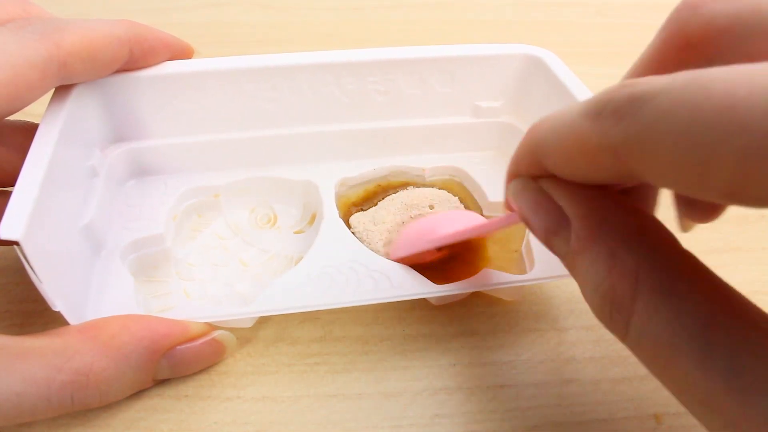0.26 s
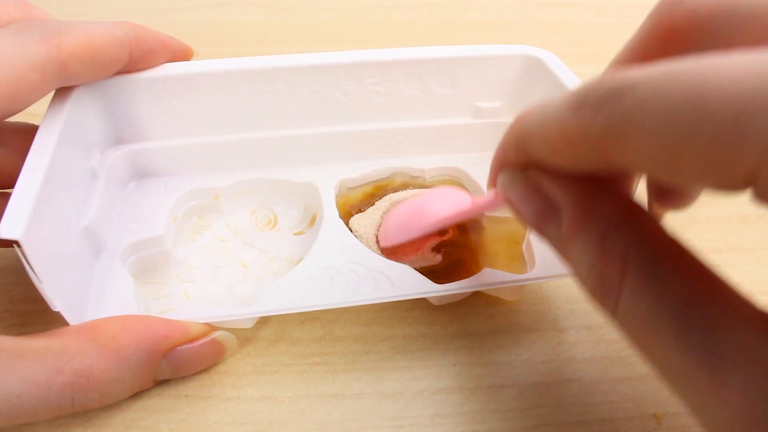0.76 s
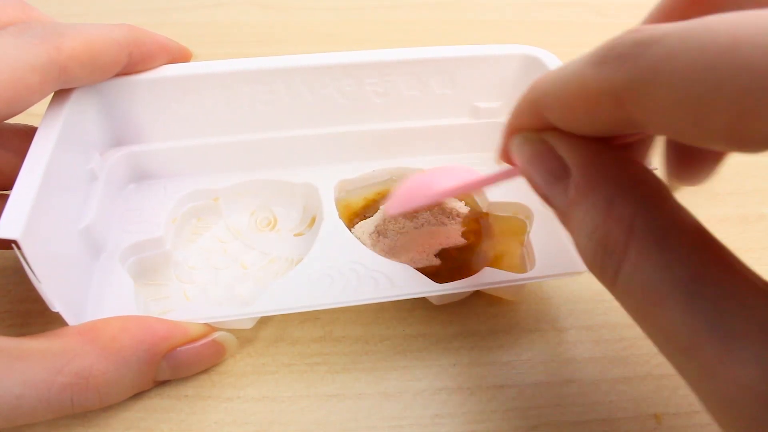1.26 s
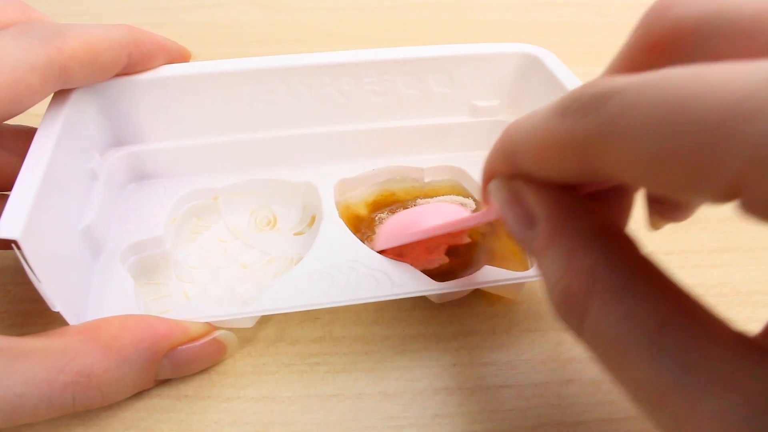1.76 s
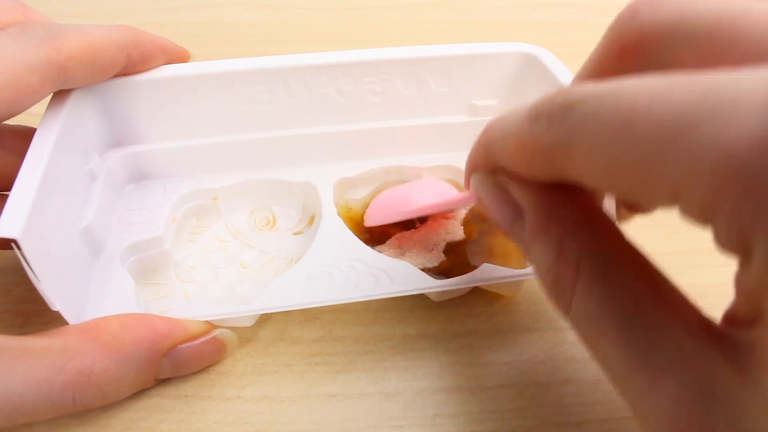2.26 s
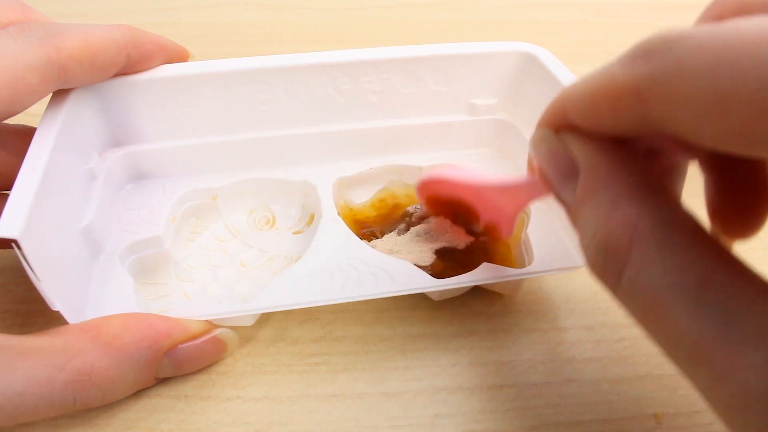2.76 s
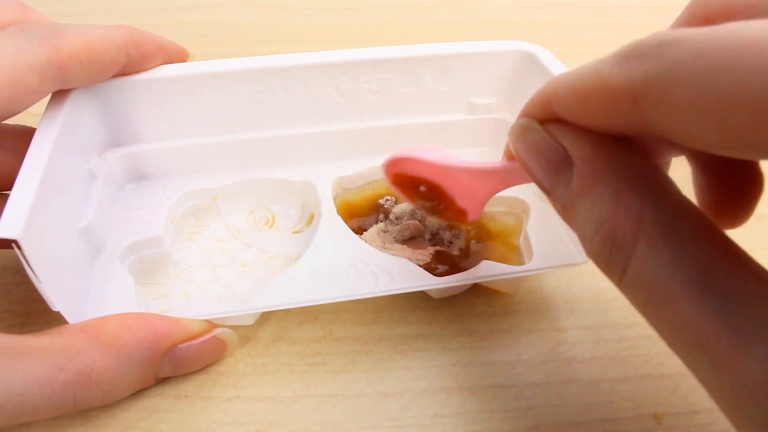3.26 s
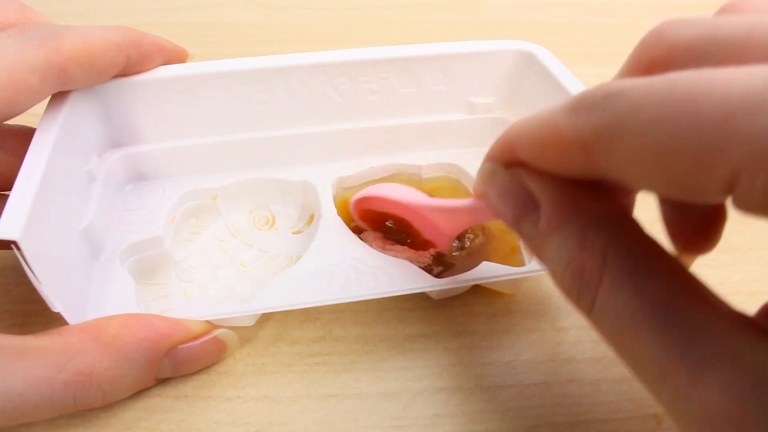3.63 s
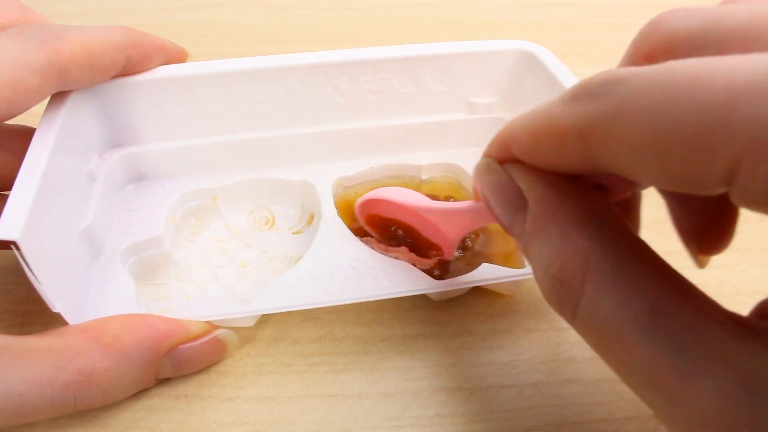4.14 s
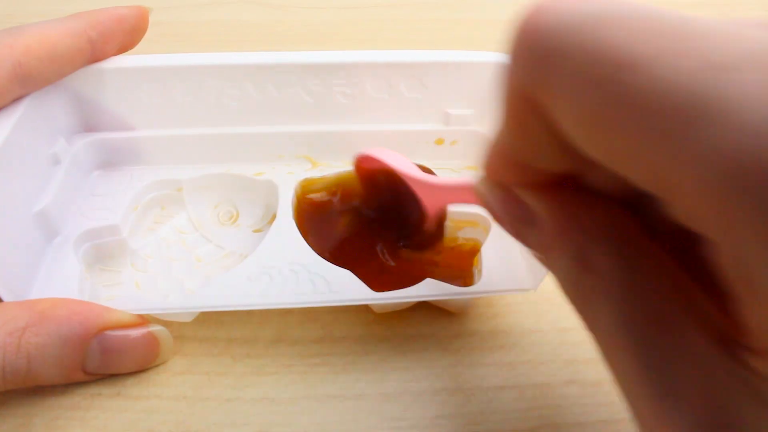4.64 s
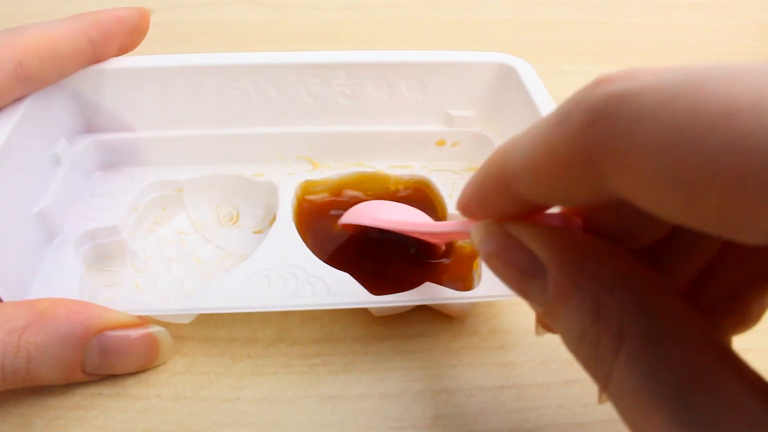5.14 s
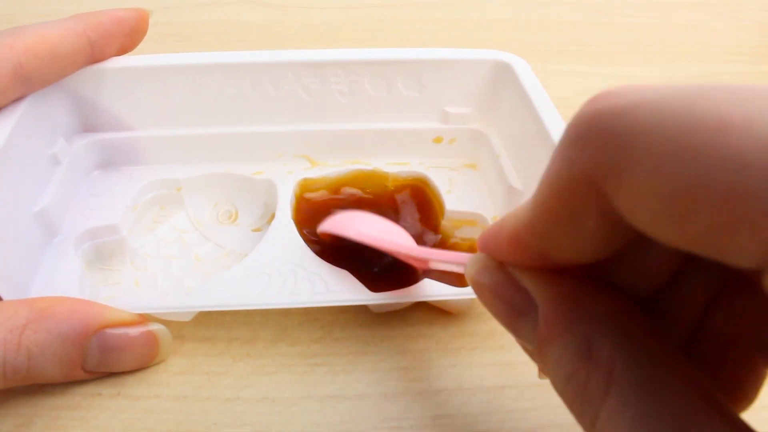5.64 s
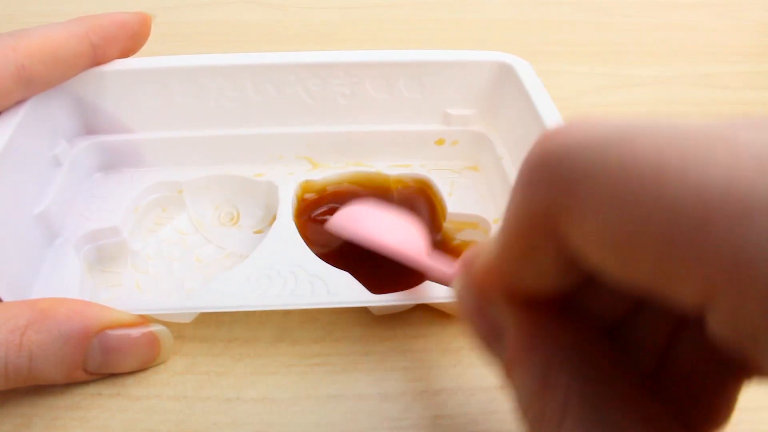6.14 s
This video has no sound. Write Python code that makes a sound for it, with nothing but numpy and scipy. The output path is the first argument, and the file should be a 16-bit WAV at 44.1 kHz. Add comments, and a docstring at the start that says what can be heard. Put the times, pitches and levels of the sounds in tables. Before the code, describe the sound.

Close, gritty spoon strokes with sharp plastic ticks work powder, then give way to wet squelching stirs, tiny squeaks and a final hard tap.

```python
"""A small plastic spoon clicks on a thin plastic tray, close to the microphone: noisy slips ring the tray's modes.
It works powder into sauce: gritty strokes of random grains swell and ease, most of them catching on the wall.
Later it stirs wet sauce: patchy crackles and tiny bubbles, two stick-slip squeaks, four rising plops,
and two knocks that ring the whole tray. A short room tail, a low hum and shaped air noise lie underneath."""
import sys
import numpy as np
from scipy import signal
from scipy.fft import rfft, irfft, next_fast_len
from scipy.io import wavfile
from scipy.ndimage import uniform_filter1d, map_coordinates

SR = 44100
rng = np.random.default_rng(int(sys.argv[2]) if len(sys.argv) > 2 else 0)


def wav_out(sig):
    """Save sig, one row per channel (or a flat mono array), as 16-bit PCM at SR to the path in sys.argv[1]."""
    wavfile.write(sys.argv[1], SR, np.round(np.clip(np.atleast_2d(sig).T, -1, 1) * 32767).astype(np.int16))


N = 282240

# Spoon catches on the tray. Each row: time in seconds, mid-band level in dB,
# treble against the mid band in dB, skid time in seconds (at least 0.002 is used).
SPOON_CONTACTS = [(0.044, -43, -5, 0.0061), (0.07, -48, 1, 0.0068), (0.313, -41.5, -7, 0.011),
                  (0.35, -42.5, -4.5, 0.0082), (0.616, -37, -15, 0.0019), (0.623, -38, -3, 0.015),
                  (0.8758, -30, -1.5, .005), (0.911, -37, -0.5, 0.006), (1.187, -46.5, -7, 0.017),
                  (1.216, -38, -4.5, 0.0042), (1.232, -45, -2.5, 0.0033), (1.457, -43, -3.5, 0.0042),
                  (1.4826, -30, -6, 0.0028), (1.489, -30, -1.5, 0.0021), (1.757, -49.5, 1, 0.024),
                  (1.7953, -27.5, .5, 0.0027), (1.807, -33.5, -2, 0.0016), (2.056, -47, -14, 0.0073),
                  (2.074, -39, -4, 0.0015), (2.081, -34.5, -17, 0.0081), (2.118, -42.5, -4, 0.01),
                  (2.311, -42, -15, 0.0022), (2.318, -40.5, -5, 0.0018), (2.343, -47, -3.5, .004),
                  (2.378, -38.5, -12, .0075), (2.387, -35, -11, 0.0096), (2.404, -42.5, -8, 0.0017),
                  (2.506, -46.5, -15.5, 0.0017), (2.556, -46.5, -18, 0.0089), (2.602, -47.5, -16, 0.012),
                  (2.639, -40.5, -7.5, 0.0023), (2.675, -49, -11, 0.0045), (2.873, -35.5, -13, 0.011),
                  (2.886, -35, -13.5, 0.014), (3.434, -42.5, 1, 0.0049), (3.447, -42.5, 2.5, 0.002),
                  (3.709, -58, -3.5, 0.0049), (4.183, -51.5, 5, 0.0034), (4.265, -44, 6, 0.009),
                  (4.45, -42.5, -8, 0.013), (4.536, -45, -0.5, 0.0079), (4.547, -41, -9, 0.018),
                  (4.595, -45, -8, 0.0029), (4.713, -44.5, -30, 0.01), (4.81, -46.5, -3.5, 0.012),
                  (4.821, -44, -7, 0.0062), (4.859, -39, -11, 0.0035), (4.97, -41.5, -10, 0.0028),
                  (5.008, -53, -12, 0.0019), (5.478, -44, -16, 0.0037), (5.4891, -32.5, -9.5, 0.0016),
                  (5.67, -50.5, -12, 0.0045), (5.791, -48.5, -10, 0.0025), (5.819, -50, -7, 0.0051),
                  (5.879, -56, -7, 0.0036), (5.925, -50.5, -9.5, 0.0094), (5.964, -47, -8, 0.0035),
                  (5.977, -47.5, -11, 0.0099), (6.048, -46, -9, 0.0069), (6.179, -42.5, -8, 0.012),
                  (6.196, -31.5, -10, .003), (6.251, -22.5, -7, 0.0022)]
# Tray wall modes. Each row: frequency in Hz, width in Hz, relative level in dB.
TRAY_MODES = [(676, 32, -14), (1209, 38, 9), (1513, 100, 6), (1926, 63, 12.5), (2677, 80, 1),
              (3264, 25, 10), (3710, 44, -5), (4030, 33, 3), (4730, 32, -2.5), (5560, 40, 3),
              (6300, 34, -8.5), (6370, 64, -2.5), (7155, 50, -26), (8120, 210, -5), (8860, 36, -42),
              (9500, 70, -6.5)]
# Spectrum of a dry contact. Each row: frequency in Hz, relative level in dB per Hz.
DRY_SNAP_SPECTRUM = [(71, -52.5), (120, -17.5), (348, -13), (712, -2.5), (1070, -10), (1210, -5),
                     (1720, -14.5), (1900, 3), (2290, -8.5), (2700, -0.5), (2990, -7), (3740, -5),
                     (4590, -10), (6910, 0.5), (16000, -21.5)]
# Spectrum of a contact under sauce. Each row: frequency in Hz, relative level in dB per Hz.
WET_SNAP_SPECTRUM = [(71, -41), (120, -11), (535, -14), (712, -5.5), (839, -15), (1210, -7.5), (1900, 2.5),
                     (2290, -3), (2590, 3), (3240, -12), (4880, -13.5), (7050, -12), (16000, -46.5)]
# Hard pushes that knock the tray on the table. Each row: time in seconds, level in dB,
# half-amplitude corner in Hz below which the ring is quiet.
TRAY_KNOCKS = [(5.488, -36.5, 2340), (6.252, -28.5, 500)]
# Modes of the whole tray. Each row: frequency in Hz, width in Hz, relative level in dB.
WHOLE_TRAY_MODES = [(438, 44, 0), (1240, 47, 7.5), (1990, 86, 0), (2440, 260, -5.5), (3580, 660, -5.5),
                    (4680, 200, -10), (4600, 250, -32), (5040, 660, -8)]
# Strokes through the powder. Each row: start in seconds, end in seconds, relative crest in dB.
POWDER_STROKES = [(-0.005, 0.095, -47.5), (0.275, 0.38, -47.5), (0.545, 0.65, -45.5), (0.812, 0.94, -43.5),
                  (1.128, 1.255, -48.5), (1.4, 1.54, -49.5), (1.705, 1.86, -50), (2.035, 2.135, -56.5),
                  (2.365, 2.41, -43), (2.5, 2.69, -54), (2.83, 2.95, -56.5), (3.11, 3.285, -55),
                  (3.405, 3.475, -46), (3.64, 3.77, -52.5), (3.9, 4.045, -51), (4.168, 4.2, -41),
                  (4.225, 4.29, -52.5)]
# Spectrum of powder grit. Each row: frequency in Hz, relative level in dB per Hz.
GRIT_SPECTRUM = [(410, -42.5), (700, -2.5), (1200, -4.5), (1660, 1), (1900, 2), (2270, -2.5), (2700, 10.5),
                 (3050, 1), (3700, 2.5), (4400, -3), (6500, 1), (8000, -1.5), (9500, -6), (11000, -5.5),
                 (13500, -8), (16000, -13.5)]
# Spells of stirring the sauce. Each row: start in seconds, end in seconds, relative crest in dB.
STIR_SPELLS = [(4.51, 5.11, -53), (5.42, 5.6, -50), (5.86, 6.39, -58.5)]
# Spectrum of sauce crackle and rub. Each row: frequency in Hz, relative level in dB per Hz.
SAUCE_SPECTRUM = [(180, -25), (300, -0.5), (690, -1), (850, -3), (1490, 1.5), (1700, -8), (1910, 6),
                  (2250, -16), (2700, -5), (3900, -17), (7600, -13), (9500, -21.5), (15000, -26)]
# Wet spoon sticks and slips. Each row: start in seconds, length in seconds, mean pitch in Hz, level in dB.
SPOON_SQUEAKS = [(4.702, 0.034, 1470, -39), (6.204, 0.031, 1930, -38.5)]
# Air pockets close in the sauce. Each row: time in seconds, starting pitch in Hz, level in dB.
AIR_PLOPS = [(4.548, 236, -37.5), (4.822, 514, -33.5), (4.829, 685, -30.5), (4.861, 400, -45)]
# Decay of the room tail. Each row: frequency in Hz, t60 in seconds.
ROOM_T60 = [(200, 0.43), (1500, 0.17), (5000, 0.18), (14000, 0.16)]
# Hum partials. Each row: frequency in Hz, rms level in dB.
HUM_PARTIALS = [(59.2, -67.5), (118.6, -68.5), (237, -71.5), (425, -74.5), (452, -73.5)]
# Spectrum of room air. Each row: frequency in Hz, relative level in dB per Hz.
AIR_SPECTRUM = [(20, -33), (40, -4), (65, 6), (100, -0.5), (135, 7), (200, -1), (260, 0.5), (370, -7),
                (450, -4), (900, -11.5), (1500, -15.5), (5000, -26), (10000, -28), (16000, -29)]

WET_FROM_S = 4.4  # contacts after this are under sauce
BODY_DRY_DB, BODY_WET_DB = -9.5, -6  # hollow boom at the usual contact level; sauce weighs the wall down
BODY_LOSS_DB_PER_DB, USUAL_CONTACT_DB = 0.26, -42  # harder contacts sound thinner
DRY_WALL_HZ, DRY_WALL_WIDTH_HZ, DRY_WALL_DB = 2760, 480, -9.5  # extra wall ring until sauce damps it
CONTACT_BANDS_HZ = [(150, 1000), (1000, 4500), (4500, 16000)]
TOUCH_S, LIFT_S = 0.014, 0.016  # gesture edges
CREST_SHARE, ONSET_DB, RELEASE_DB = 0.63, -8.5, -12.5  # stroke: crest position, end levels against it
STIR_CREST_SHARE, STIR_ONSET_DB, STIR_RELEASE_DB = 0.34, -8, -10  # stirring crests earlier
TOP_HZ = 16300


def contacts(wall_t60_s=0.057, wall_db=-8, ring_db=-5, bite_s=0.00064, lead_s=0.006, lead_db=-19):
    """Each contact is a quick run of slips; they ring the tray's modes and rattle its thin walls."""
    out = np.zeros(N)
    t = np.arange(SR // 8) / SR - lead_s
    attack = (t > 0) & (t < 0.01)
    for s, db, edge_db, skid_s in SPOON_CONTACTS:
        wet = s > WET_FROM_S
        body_db = BODY_WET_DB if wet else BODY_DRY_DB
        body_db -= BODY_LOSS_DB_PER_DB * (db - USUAL_CONTACT_DB)
        # the spoon drags for a moment before it catches
        catch = np.exp(np.minimum(t, 0) / bite_s)
        catch *= np.exp(-(np.maximum(t, 0) / max(skid_s, 0.002)) ** 2)
        drag = amp(lead_db) * (t < 0) * (1 + t / lead_s)
        slips = grains(12000, 3.4, size=len(t)) * (catch + drag)
        rattle = rng.standard_normal(len(t)) * (t > 0) * fade(t, wall_t60_s)
        force = unit(slips) + amp(wall_db) * unit(rattle)
        # each spot of the wall has its own colour
        pitch_factor = np.exp(0.028 * rng.standard_normal())
        snap = shifted(WET_SNAP_SPECTRUM if wet else DRY_SNAP_SPECTRUM, pitch_factor)
        spot_modes = struck(TRAY_MODES, scatter_db=3.5, detune=0.01)
        hit = coloured(force, snap) + amp(ring_db) * ringing(force, spot_modes)
        if not wet:
            hit = hit + amp(DRY_WALL_DB) * ringing(force, [(DRY_WALL_HZ, DRY_WALL_WIDTH_HZ, 0)])
        # set each band's level over the first 10 ms
        for band_hz, band_db in zip(CONTACT_BANDS_HZ, (body_db, 0, edge_db)):
            bandpass = signal.butter(3, band_hz, "band", fs=SR, output="sos")
            part = signal.sosfilt(bandpass, hit)
            add(out, s - lead_s, amp(db + band_db) * part / part[attack].std())
    return out


def knocks(t60_s=0.073):
    """The knocked tray chatters and rings as a whole; a glancing knock leaves the low modes quiet."""
    out = np.zeros(N)
    t = np.arange(SR // 4) / SR
    for s, db, low_hz in TRAY_KNOCKS:
        chatter = grains(4500, 5.0, size=len(t)) * fade(t, t60_s)
        ring = ringing(chatter, WHOLE_TRAY_MODES)
        ring = filtered(ring, lambda hz: hz ** 3 / (hz ** 3 + low_hz ** 3))
        add(out, s, amp(db) * ring / ring[t < 0.02].std())
    return out


def powder(ring_db=-10, lumps_db=2.0, level_db=-0.5, tick_db=-7):
    """Powder grinds unevenly under the swelling pressure of each stroke, and the spoon ticks on the way."""
    pressure = effort(POWDER_STROKES, CREST_SHARE, ONSET_DB, RELEASE_DB)
    grit = coloured(grains(9000, 2.6, size=N), GRIT_SPECTRUM)
    grit = grit + amp(ring_db) * ringing(grains(5700, 2.9, size=N), TRAY_MODES)
    lumps = amp(lumps_db * wobble(90))
    touches = ticks(DRY_SNAP_SPECTRUM, rate_hz=60, spread_db=5, t60_s=0.022, ring_db=-6.5)
    return amp(level_db) * pressure * (lumps * patchy(grit, depth_db=4.5) + amp(tick_db) * touches)


def sauce(level_db=3.0, bubble_db=-4, clump_db=5.5, tick_db=-4):
    """Sticky films tear in clumps of crackles and small bubbles as the spoon stirs and brushes the wall."""
    speed = effort(STIR_SPELLS, STIR_CREST_SHARE, STIR_ONSET_DB, STIR_RELEASE_DB)
    crackle = coloured(grains(4000, 2.6, size=N), SAUCE_SPECTRUM)
    squelch = patchy(crackle, depth_db=4.5) + amp(bubble_db) * bubbles()
    clumped = unit(squelch * amp(clump_db * wobble(60)))
    touches = ticks(WET_SNAP_SPECTRUM, rate_hz=26, spread_db=16, t60_s=0.05, ring_db=-2)
    return speed * (amp(level_db) * clumped + amp(tick_db) * touches)


def bubbles(centre_hz=1700, spread=0.346, cycles=8, rise=0.078, count=1500):
    """Tiny bubbles: short damped tones that rise in pitch, at rms 1."""
    out = np.zeros(N)
    t = np.arange(SR // 30) / SR
    starts_s = rng.uniform(0, N / SR, count)
    for s, (pitch, size) in zip(starts_s, rng.standard_normal((count, 2))):
        turns = min(centre_hz * np.exp(spread * pitch), SR / 12) * t
        age = turns / cycles
        tone = np.sin(2 * np.pi * turns * (1 + rise * np.minimum(age, 2)))
        add(out, s, amp(2.7 * size) * tone * age * np.exp(-2 * age))
    return unit(out)


def squeaks(jitter=0.034, overtone_db=-24, rub_db=-7):
    """Brief stick-slip tones of unsteady pitch, with a little rubbing noise."""
    out = np.zeros(N)
    for s, length_s, hz, db in SPOON_SQUEAKS:
        n = int(length_s * SR)
        waver = unit(uniform_filter1d(rng.standard_normal(n), size=60))
        phase = 2 * np.pi * np.cumsum(hz * (1 + jitter * waver)) / SR
        tone = np.sin(phase) + amp(overtone_db) * np.sin(2 * phase)
        rub = amp(rub_db) * coloured(rng.standard_normal(n), SAUCE_SPECTRUM)
        add(out, s, amp(db) * unit(np.hanning(n) * (tone + rub)))
    return out


def plops(t60_s=0.035, rise_per_s=6, attack_s=0.00031):
    """Air pockets ring briefly in the thick sauce, rising in pitch."""
    out = np.zeros(N)
    t = np.arange(SR // 10) / SR
    envelope = fade(t, t60_s) * (1 - np.exp(-t / attack_s))
    for s, hz, db in AIR_PLOPS:
        tone = np.sin(2 * np.pi * hz * t * (1 + rise_per_s * t))
        add(out, s, amp(db) * tone * envelope)
    return out


def effort(gestures, crest_share, onset_db, release_db):
    """Gain of the hand's gestures: each touches down, swells to a crest, eases and lifts."""
    t, out = np.arange(N) / SR, np.zeros(N)
    for start, end, db in gestures:
        crest = start + np.clip(crest_share, 0.05, 0.95) * (end - start)
        touching = np.clip((t - start) / TOUCH_S, 0, 1) * np.clip((end - t) / LIFT_S, 0, 1)
        out += touching * amp(db + np.interp(t, [start, crest, end], [onset_db, 0, release_db]))
    return out


def ticks(spectrum, rate_hz, spread_db, t60_s, ring_db):
    """Light touches of the spoon on the wall at loosely even moments, at rms 1."""
    force = np.zeros(N)
    t = np.arange(SR // 20) / SR
    for k, (delay, size) in enumerate(rng.random((int(rate_hz * N / SR), 2))):
        touch = fade(t, t60_s) * rng.standard_normal(len(t))
        add(force, (k + delay) / rate_hz, amp(spread_db * size) * touch)
    return unit(coloured(force, spectrum) + amp(ring_db) * ringing(force, TRAY_MODES))


def struck(modes, scatter_db, detune):
    """The modes as one spot of the wall sounds them: each a little louder or softer, higher or lower."""
    scatter = rng.standard_normal((len(modes), 2))
    return [(hz * np.exp(detune * a), width, db + scatter_db * b)
            for (hz, width, db), (a, b) in zip(modes, scatter)]


def ringing(x, modes):
    """x through causal resonances of alternating sign, at rms 1."""
    def response(hz):
        total = 0
        for k, (centre, width, db) in enumerate(modes):
            loss = 1j * hz * width
            total = total + (-1) ** k * amp(db) * loss / (centre * centre - hz * hz + loss)
        return total
    return unit(filtered(x, response))


def grains(rate_hz, spread_db, size):
    """Random tiny impulses of uneven strength and random sign, at rms 1."""
    hits = rng.random(size) < rate_hz / SR
    signs = rng.choice([-1, 1], size)
    return unit(hits * signs * amp(spread_db * rng.standard_normal(size)))


def patchy(x, depth_db):
    """x with a colour that drifts by patches of time and frequency, at rms 1."""
    z = signal.stft(x, nperseg=256)[2]
    field = uniform_filter1d(rng.standard_normal(z.shape), size=4, axis=0)
    field = uniform_filter1d(field, size=10, axis=1)
    return unit(signal.istft(z * amp(depth_db * unit(field)), nperseg=256)[1][:len(x)])


def wobble(rate_hz):
    """A smooth random curve through rate_hz knots a second."""
    knots = rng.standard_normal(int(N * rate_hz / SR) + 4)
    return map_coordinates(knots, [np.arange(N) * rate_hz / SR])


def shifted(table, factor):
    """A table of (Hz, ..) rows with its frequencies scaled."""
    return [(hz * factor, *rest) for hz, *rest in table]


def coloured(x, spectrum):
    """x filtered by the given spectrum, at rms 1."""
    return unit(filtered(x, lambda hz: amp(along(spectrum, hz))))


def filtered(x, response):
    """x through a frequency response, zero-padded."""
    n = x.shape[-1]
    m = next_fast_len(n + 8192)
    return irfft(rfft(x, m) * response(np.fft.rfftfreq(m, 1 / SR)), m)[..., :n]


def along(points, hz):
    """Interpolate (Hz, value) points on a log frequency axis."""
    f, v = np.transpose(points)
    return np.interp(np.log(hz + 1), np.log(f + 1), v)


def fade(t, t60_s):
    """Decay by a factor of a thousand in t60_s."""
    return np.exp(-np.log(1000) * t / t60_s)


def add(track, s, x):
    """Mix x into the track from time s in seconds."""
    part = track[round(s * SR):][:len(x)]
    part += x[:len(part)]


def amp(db):
    """dB to amplitude."""
    return 10 ** (np.asarray(db) / 20)


def unit(x):
    """x at rms 1."""
    return x / np.sqrt(np.mean(x ** 2) + 1e-20)


def room(x, build_s=0.0013, count=32):
    """A short diffuse tail; a fresh random tail for each slice, so no fixed tones build up."""
    out, start = np.zeros(N), 0
    for piece in np.array_split(x, count):
        hz, t, z = signal.stft(rng.standard_normal(SR // 2), SR, nperseg=256)
        decay = fade(t, along(ROOM_T60, hz)[:, None])
        tail = signal.istft(z * decay, SR, nperseg=256)[1]
        tail *= 1 - np.exp(-np.arange(len(tail)) / SR / build_s)
        add(out, start / SR, signal.fftconvolve(piece, tail / np.linalg.norm(tail)))
        start += len(piece)
    return out


def background(air_db=-59, drift_rad=0.26):
    """Steady room air as shaped noise, and a slightly unsteady appliance hum of phase-drifting sines."""
    t = np.arange(N) / SR
    hum = np.zeros(N)
    for hz, db in HUM_PARTIALS:
        # the higher partials waver more
        drift = drift_rad * hz / HUM_PARTIALS[0][0] * wobble(4)
        hum += amp(db) * unit(np.sin(2 * np.pi * hz * t + drift))
    return hum + amp(air_db) * coloured(rng.standard_normal(N), AIR_SPECTRUM)


def scene():
    """Spoon, tray and sauce close to the microphone, with a little room; nearly mono."""
    spoon = contacts() + knocks() + powder() + sauce() + squeaks() + plops()
    mono = spoon + amp(-11.5) * room(spoon) + background()
    side = amp(-29.5) * filtered(mono, lambda hz: 1j)  # a slight phase difference between the channels
    balance = amp([[0.13], [-0.13]])  # dB per channel
    return np.array([mono + side, mono - side]) * balance


def record(dry):
    """The recorder keeps nothing above its band limit."""
    return filtered(dry, lambda hz: hz < TOP_HZ)


dry = scene()
out = record(dry)
wav_out(out)
```